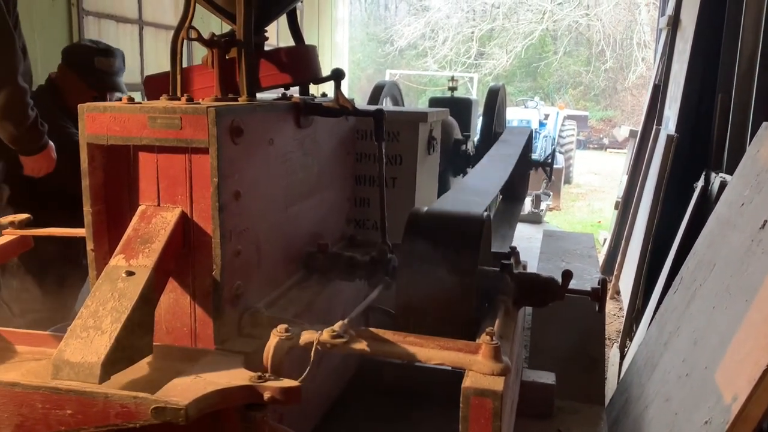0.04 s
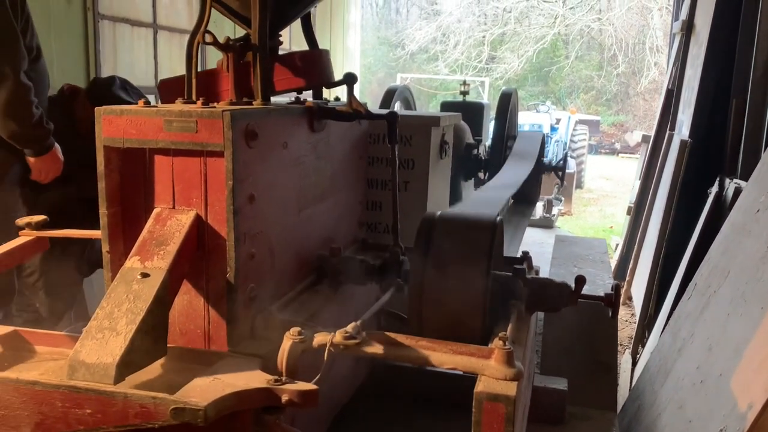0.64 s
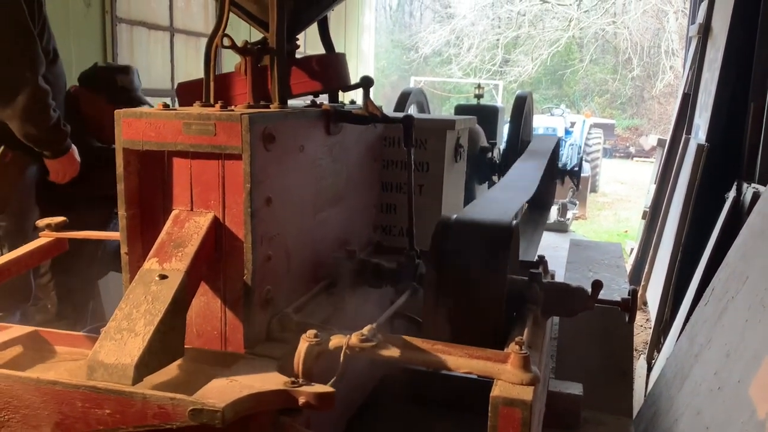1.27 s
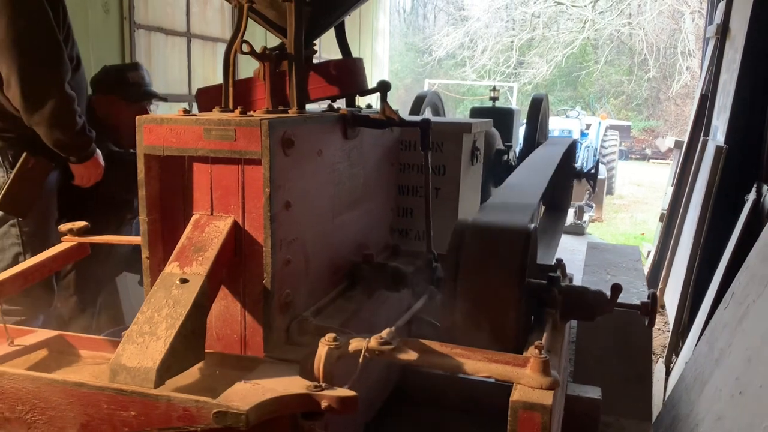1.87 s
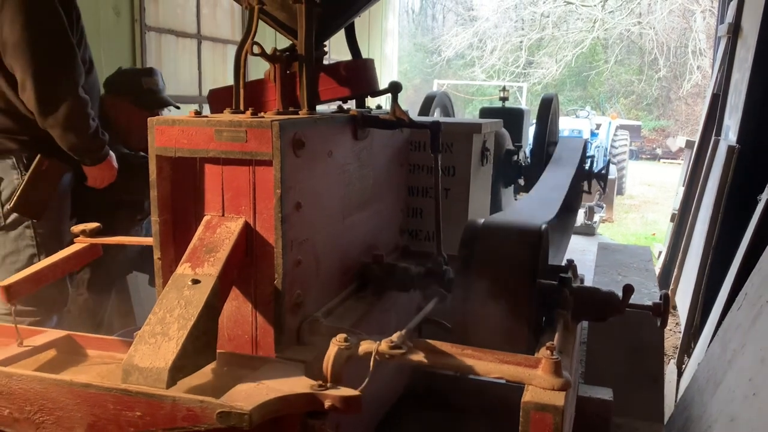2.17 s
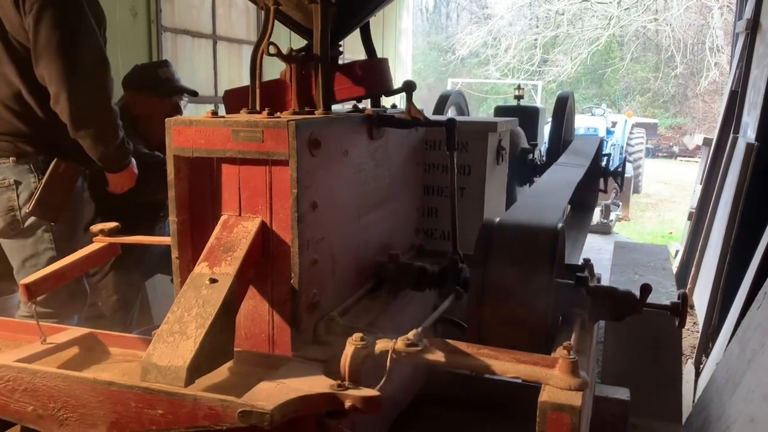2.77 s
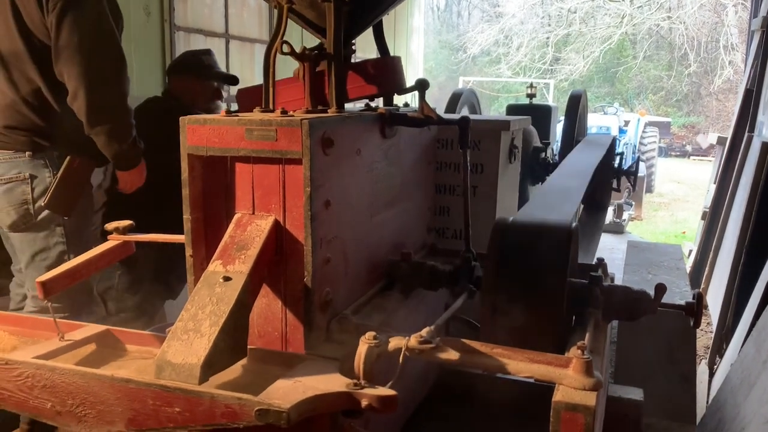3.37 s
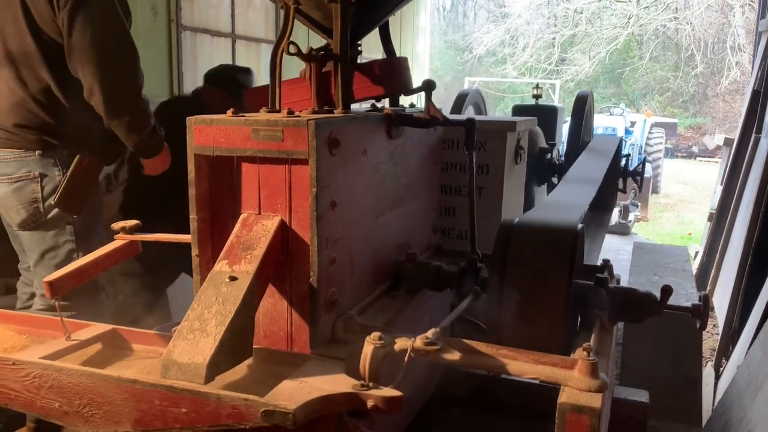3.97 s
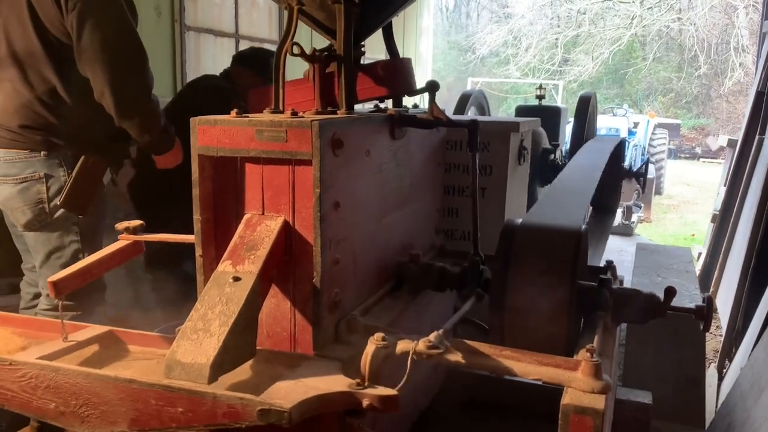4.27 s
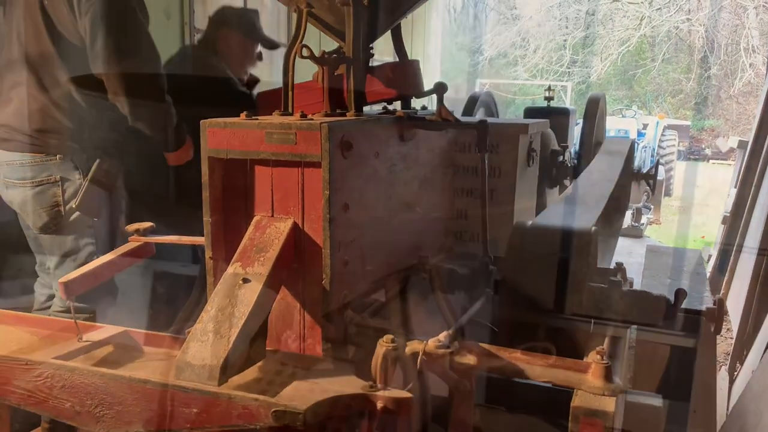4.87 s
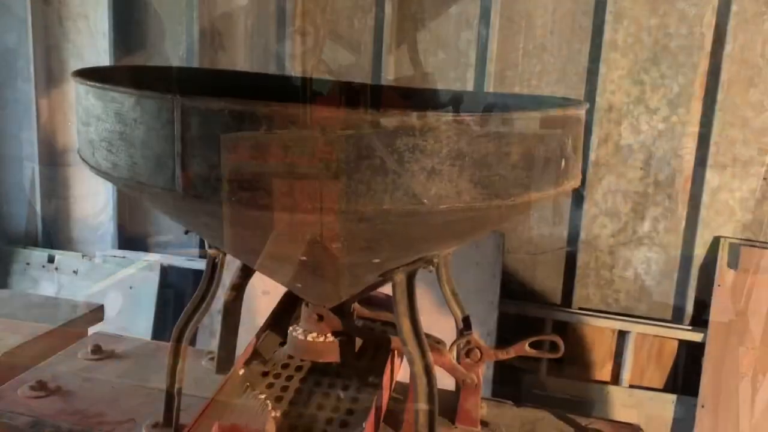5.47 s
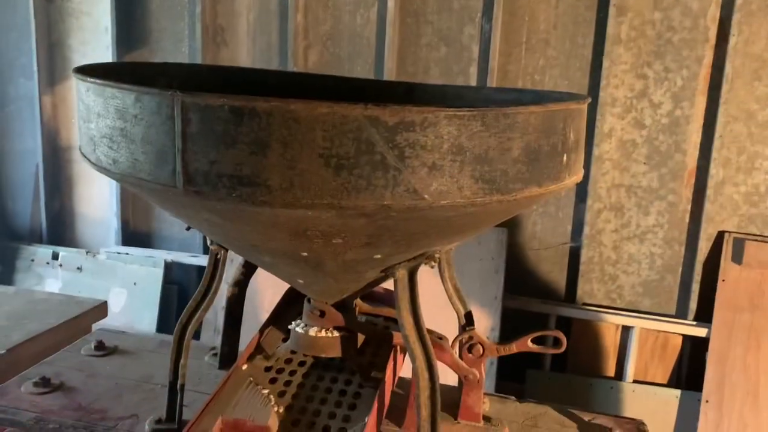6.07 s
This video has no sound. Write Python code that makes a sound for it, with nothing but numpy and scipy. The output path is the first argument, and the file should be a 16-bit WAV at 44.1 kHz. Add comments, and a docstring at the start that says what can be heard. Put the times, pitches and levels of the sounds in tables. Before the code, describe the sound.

A belt-driven mill rumbles and grinds grain under the slow, sharp, regular beat of an engine, turning slightly quieter near the end.

```python
"""Engine driving a grain mill.

A slow single-cylinder engine outside a shed fires twice a second: a sharp exhaust bark and ringing iron over a
falling boom. It drives the mill by a flat belt. The case rumbles, and each cycle the belt surges, the grinding
swells and the gear spits. Wood scrapes once. For the last second the sound blends over to a quieter spot
farther inside."""
import sys
import numpy as np
from scipy import signal
from scipy.fft import rfft, irfft, next_fast_len
from scipy.io import wavfile

SR = 44100
rng = np.random.default_rng(int(sys.argv[2]) if len(sys.argv) > 2 else 0)


def dump(signal):
    """Clip the signal to [-1, 1] and save it as 16-bit WAV at the path in sys.argv[1]."""
    limited = np.clip(np.atleast_2d(signal).T, -1, 1)
    pcm = np.round(limited * 32767).astype(np.int16)
    wavfile.write(sys.argv[1], SR, pcm)


N = 274743
TIME_S = np.arange(N) / SR
GRID_HZ = np.maximum(np.fft.rfftfreq(next_fast_len(N, real=True), 1 / SR), 1)

# Blend from the door to a spot farther inside, 0 to 1: time_s, share
SPOT_BLEND = [(4.85, 0.041), (5.35, 1)]
# Left-right likeness: freq_hz, correlation
STEREO_LIKENESS = [(100, .99), (280, .96), (600, .62), (1500, .45), (4000, .45), (7000, .65), (9000, .94),
                   (14000, .96)]
# Left minus right: freq_hz, level_db
STEREO_BALANCE = [(30, -4), (70, 3.5), (150, 2), (380, 0.5), (700, -3.5), (1300, -0.5), (4400, -1),
                  (8000, -0.5), (14000, 0.5)]
# Left behind right: freq_hz, lag_s
STEREO_LAG = [(100, .00014), (300, .00022), (900, .00014), (1600, .0001), (2400, .00008), (3200, .00029),
              (16000, .00029)]

# Noise spectra: freq_hz, density_db
RUMBLE_COLOUR = [(20, -46), (40, -28), (60, -3.5), (95, 5), (170, 3), (230, 0), (340, -1.5), (420, -9.5),
                 (520, -12.5), (800, -56)]
STONE_COLOUR = [(300, 4.5), (520, 0), (700, 1), (1050, 0), (1600, -0.5), (2300, -1.5), (3500, -9),
                (7000, -16), (16000, -53)]
MEAL_COLOUR = [(800, -25), (2200, -41), (4000, 13.5), (6500, 2), (9000, 5.5), (13800, 0.5), (16000, -22)]
SCRAPE_COLOUR = [(300, -29), (800, -7), (1100, -1), (1600, -7), (2500, -11), (6000, -63)]
SPIT_COLOUR = [(2000, 3), (5000, 7.5), (9000, 12), (13500, 12), (16000, 10.5)]
CLACK_COLOUR = [(400, 3), (900, 1), (1600, -8.5), (2300, 1.5), (3200, -6), (6000, -31), (12000, -35)]
VALVE_COLOUR = [(1500, -39), (2500, -2), (4000, 6), (6500, 2), (9500, 2.5), (13500, 0.5), (16000, -17)]
BARK_COLOUR = [(250, 13), (450, 10.5), (700, -14), (1300, 10), (2200, 4.5), (3300, 6.5), (6300, -0.5),
               (9000, 7.5), (13500, -49), (16000, -5)]

# Resonances on the noise: freq_hz, width_hz, gain_db
CASE_MODES = [(271, 8.7, 2.6), (310, 120, 1.5), (152, 50, 2), (456, 34, 5.3)]
STONE_MODES = [(681, 9, 6.5), (824, 20, 7.5), (991, 21, 9), (1035, 11, -1), (1290, 43, 4.5),
               (1750, 22, -0.5), (1986, 24, 1.5), (2210, 18, 5), (2833, 26, 12.5)]
SPOUT_MODES = [(3490, 650, -24), (3860, 29, 16), (4300, 17, 0), (5940, 44, 9.5)]
KNOCK_MODES = [(1005, 70, 16), (805, 50, 10)]
CLACK_MODES = [(1770, 45, 3), (2210, 160, 4.2), (2660, 120, 3), (2970, 90, 4.6)]
EXHAUST_MODES = [(800, 57, 19.5), (1080, 59, 7), (1347, 10.5, 12.5), (1550, 77, 4.5), (1731, 18, 16),
                 (2010, 110, 9.5), (2185, 50, 11.5), (2410, 49, 4), (2540, 120, 9), (2676, 130, 9),
                 (2924, 126, 10), (3320, 61, -10), (4870, 130, 5.5), (5530, 730, 9.5), (6270, 380, 10)]
SCRAPE_MODES = [(1060, 120, 3), (774, 50, 8), (1380, 60, 6.1), (1700, 110, 5)]

# Mill load over one engine cycle: cycle_fraction, stones_db, meal_db, rumble_db, drone_db
CYCLE_LOAD = [(0, 0.5, -22, 4, -2), (.15, -4.5, -6.5, -1, -0.5), (.3, -5, -10.5, 2, 2.5),
              (.37, -6, -10.5, -2.5, -4), (.47, -2.5, -0.5, 1, -1.5), (.57, 0, 1.5, 0, 4),
              (.68, 3.5, -0.5, 3.5, 4.5), (.79, -2.5, -6, 3, 3), (.9, -3.5, -6, 0, 1.5),
              (1, -5, -18, 2.5, -4)]
# Belt surges: peak_s, level_db, pitch_hz
BELT_SURGES = [(.01, -18, 135), (0.514, -11, 116), (.605, -15, 110), (.755, -16, 121), (1.041, -15.5, 115),
               (1.43, -21.5, 167), (1.469, -13, 123), (1.569, -16, 121), (1.976, -12, 117),
               (2.245, -23, 109), (2.453, -9, 118), (2.564, -13.5, 106), (2.91, -18, 123),
               (2.979, -15, 122), (3.39, -17, 129), (3.47, -14.5, 120), (3.709, -16, 124),
               (3.809, -18, 129), (3.929, -16.5, 119), (4.35, -23, 135), (4.669, -9, 113),
               (4.771, -15.5, 111), (4.851, -21, 128), (5.111, -15, 115)]
# Loose parts, every cycle: after_firing_s, level_db
CYCLE_CLATTER = [(-.03, -39), (0.089, -23.5), (0.269, -22)]
# One-off events in the mill: start_s, level_db
CASE_SHUDDER = [(4.656, -17.5)]
EXTRA_KNOCKS = [(0.457, -28), (.92, -26), (1.346, -30), (1.748, -27), (2.349, -18.5), (3.169, -25),
                (3.441, -25), (3.667, -24), (3.805, -26.5), (3.857, -22), (5.729, -30), (5.762, -27.5),
                (5.994, -28)]
GRIT_TICKS = [(1.961, -26), (2.45, -28), (2.492, -20), (3.403, -29), (3.884, -26), (5.241, -33),
              (5.496, -25), (5.535, -29), (5.803, -31), (5.942, -33)]
# Scrape contour: time_s, level_db
SCRAPE_ENVELOPE = [(4.68, -33), (4.735, -28), (4.772, -22), (4.79, -23), (4.85, -27), (4.93, -49)]
# Wood catching: start_s, level_db, rise_s, t60_s, pitch_hz
SQUEAKS = [(4.728, -21.5, .008, 0.52, 1034), (4.773, -14.5, .014, 0.085, 1090),
           (4.822, -27, 0.011, 0.17, 1005)]
# Gear spit at the door (0) and farther inside (1): share, peak_db, rise_s, t60_s
SPIT_SHAPE = [(0, -21.5, 0.0046, 0.18), (1, -24.5, 0.062, 0.85)]

# Engine beats, one doubled: time_s, bark_db, boom_db, iron_db, strongest_mode_hz, tick_db
FIRINGS = [(0.141, -15, -20, -11, 1750, -45), (0.6324, -15, -18, -19, 1090, -38),
           (1.1196, -16.5, -17, -18, 2200, -32), (1.6051, -17.5, -18, -21, 2200, -33),
           (2.09, -16, -19, -13, 2200, -33), (2.5764, -15.5, -20, -14.5, 1750, -33),
           (3.063, -16.5, -16.5, -11, 2200, -24), (3.5484, -15, -15, -15.5, 1576, -37),
           (4.032, -16.5, -18, -13.5, 1310, -35), (4.511, -16, -16.5, -17, 2300, -35),
           (4.9956, -20, -17, -23, 1090, -43), (5.058, -25.5, -24, -31, 1090, -55),
           (5.601, -18.5, -17.5, -23, 1750, -45), (6.143, -15.5, -19, -19, 2300, -49)]
# Engine iron: freq_hz, level_db, t60_s
IRON_MODES = [(587.5, -13, 0.28), (795, -11, .15), (1090, -13, 0.15), (1310, -11.5, 0.15),
              (1576, -16, 0.17), (1732, -12, 0.15), (2200, -4.5, 0.13), (2302, -6, 0.17), (2890, -8, 0.18)]
# Exhaust boom: age_s, pitch_hz, level_db
BOOM_SWEEP = [(-.012, 202, -56), (.002, 225, 5), (.018, 128, -1), (.04, 87, 1.5), (.065, 65, 1.5),
              (.1, 56, -0.5), (.14, 54, -28), (.22, 52, -40)]
# Shed ringing: freq_hz, level_db, delay_s, rise_s
SHED_MODES = [(39.2, -3, 0.01, 0.024), (161.4, -7, 0, 0.024), (396, -18, 0, 0.032),
              (434.4, -17, 0.02, 0.024), (309.6, -1, 0.024, 0.019), (165.9, -5.5, 0.1, 0.025),
              (120.5, -8.5, 0.104, 0.047), (306.6, -11.5, 0.052, 0.1), (287.4, -11.5, 0.057, 0.1)]


def from_db(db):
    """Decibels to gain."""
    return 10 ** (np.asarray(db) / 20)


def unit_rms(x):
    """Scale to unit power."""
    return x / np.sqrt(np.mean(x ** 2) + 1e-20)


def lookup(table, where):
    """Interpolate the other columns along the first."""
    first, *columns = np.transpose(table)
    return [np.interp(where, first, column) for column in columns]


def on_grid(table):
    """Interpolate a spectrum table over log frequency."""
    hz, value = np.transpose(table)
    return np.interp(np.log(GRID_HZ), np.log(hz), value)


def white_spectrum():
    """Complex spectrum of white noise."""
    return rng.standard_normal(len(GRID_HZ)) + 1j * rng.standard_normal(len(GRID_HZ))


def drift(rate_hz):
    """Smooth random wander, unit RMS."""
    return unit_rms(irfft(white_spectrum() / (1 + (GRID_HZ / rate_hz) ** 2))[:N])


def noise(colour, modes=()):
    """Coloured stereo noise, unit RMS; the shed makes the sides differ."""
    modes_db = sum(db / (1 + (2 * (GRID_HZ - hz) / width_hz) ** 2) for hz, width_hz, db in modes)
    likeness = on_grid(STEREO_LIKENESS)
    mid = np.sqrt(1 + likeness) * white_spectrum()
    side = np.sqrt(1 - likeness) * white_spectrum()
    spectrum = from_db(on_grid(colour) + modes_db) * np.array([mid + side, mid - side])
    return unit_rms(irfft(spectrum)[:, :N])


def tone(pitch_hz):
    """Sine following a pitch curve."""
    return np.sin(2 * np.pi * np.cumsum(pitch_hz) / SR)


def lowpass(x, cutoff_hz):
    """Second-order low-pass."""
    return signal.sosfilt(signal.butter(2, cutoff_hz, fs=SR, output="sos"), x)


def bursts(starts_s, levels_db, rises_s, t60s_s):
    """Envelope of Gaussian rises and exponential decays, summed in power."""
    power = np.zeros(N)
    for start_s, db, rise_s, t60_s in np.broadcast(starts_s, levels_db, rises_s, t60s_s):
        span = slice(*np.searchsorted(TIME_S, [start_s - 2 * rise_s, start_s + rise_s + 2 * t60_s]))
        past_peak_s = TIME_S[span] - start_s - rise_s
        shape_db = np.where(past_peak_s < 0, -20 * (past_peak_s / rise_s) ** 2, -60 * past_peak_s / t60_s)
        power[span] += from_db(db + shape_db) ** 2
    return np.sqrt(power)


def swell(age_s, rise_s):
    """Resonance envelope: builds to 1, then dies."""
    progress = np.maximum(age_s, 0) / rise_s
    return progress ** 2 * np.exp(2 * (1 - progress))


def pings(starts_s, levels_db, low_hz, high_hz, t60_cycles):
    """Small hard contacts: random pitch, random phase per side, shorter when higher."""
    out = np.zeros((2, N))
    for start_s, db, (pitch, left, right) in zip(starts_s, levels_db, rng.random((len(starts_s), 3))):
        hz = low_hz * (high_hz / low_hz) ** pitch
        t60_s = t60_cycles / hz
        span = slice(*np.searchsorted(TIME_S, [start_s, start_s + t60_s]))
        age_s = TIME_S[span] - start_s
        envelope = (1 - np.exp(-age_s * hz)) * from_db(db - 60 * age_s / t60_s)
        out[:, span] += envelope * np.sin(2 * np.pi * hz * age_s + np.pi * np.array([[left], [right]]))
    return out


def inside(times_s=TIME_S):
    """Share of the spot farther inside, 0 to 1."""
    return lookup(SPOT_BLEND, times_s)[0]


def cycle_starts():
    """Firing times without the doubled beat, extended one cycle each way."""
    fire_s = np.array(FIRINGS)[:, 0]
    fire_s = fire_s[np.diff(fire_s, prepend=-1) > 0.2]
    return np.r_[2 * fire_s[0] - fire_s[1], fire_s, 2 * fire_s[-1] - fire_s[-2]]


def cycle_load_db():
    """Level swings of stones, meal, rumble and drone, locked to the engine."""
    starts_s = cycle_starts()
    cycle_fraction = np.interp(TIME_S, starts_s, np.arange(len(starts_s))) % 1
    return lookup(CYCLE_LOAD, cycle_fraction)


def case_rumble(level_db, inside_db, throb_db):
    """The mill's wooden case rumbles unevenly with the load and shudders once."""
    _, _, load_db, _ = cycle_load_db()
    running = from_db(level_db + load_db + inside_db * inside() + throb_db * np.tanh(drift(17)))
    shudder = bursts(*np.transpose(CASE_SHUDDER), rises_s=0.012, t60s_s=0.47)
    return np.hypot(running, shudder) * noise(RUMBLE_COLOUR, CASE_MODES)


def case_hum(level_db, inside_db, pitch_hz, wander_hz, flutter_db):
    """One mode of the case sings as a wavering hum."""
    hum = tone(pitch_hz + wander_hz * drift(7.4))
    return from_db(level_db + inside_db * inside() + flutter_db * np.tanh(drift(22))) * hum


def belt_drone(level_db, inside_db, pitch_hz, wander_hz, flutter_db, surge_width_s, sag_hz_per_s):
    """Belt and frame drone on an unsteady note; each surge swells and sags in pitch."""
    *_, load_db = cycle_load_db()
    gain = from_db(level_db + load_db + inside_db * inside() + flutter_db * np.tanh(drift(25)))
    out = gain * tone(pitch_hz + wander_hz * drift(11.2))
    for peak_s, db, hz in BELT_SURGES:
        age_s = TIME_S - peak_s
        turns = hz * age_s - sag_hz_per_s * age_s ** 2 / 2 + rng.random()
        out += from_db(db) * np.exp(-(age_s / surge_width_s) ** 2) * np.sin(2 * np.pi * turns)
    return out


def grinding(stones_db, stones_inside_db, meal_db, meal_inside_db, cracks_per_s):
    """Each firing pulls the stones round faster: grain crunches, kernels crack, meal hisses out."""
    stones_load_db, meal_load_db, *_ = cycle_load_db()
    resistance_db = 1.7 * np.tanh(drift(18))  # a kernel resists only so much
    crunch_db = stones_db + stones_inside_db * inside() + stones_load_db + resistance_db
    hiss_db = meal_db + meal_inside_db * inside() + meal_load_db + 1.37 * drift(240)
    cracked = rng.random(N) < cracks_per_s / SR
    size_db = -5.5 + 1.8 * np.minimum(rng.exponential(1, cracked.sum()), 3)
    cracks = pings(TIME_S[cracked], crunch_db[cracked] + size_db, low_hz=602, high_hz=1996, t60_cycles=72)
    crunch = from_db(crunch_db) * noise(STONE_COLOUR, STONE_MODES)
    return crunch + cracks + from_db(hiss_db) * noise(MEAL_COLOUR, SPOUT_MODES)


def mill_knocks(clatter_inside_db, rise_s, clatter_t60_s, extra_t60_s):
    """Loose parts clatter each cycle in the stones; further knocks, some of them loud, ring the casing at a
    common pitch."""
    hits = [(start_s + delay_s, db + rng.uniform(-1.3, 1.1))
            for start_s in cycle_starts() for delay_s, db in CYCLE_CLATTER]
    hit_s, hit_db = np.transpose(hits)
    clatter = bursts(hit_s, hit_db + clatter_inside_db * inside(hit_s), rise_s, clatter_t60_s)
    extra = bursts(*np.transpose(EXTRA_KNOCKS), rise_s, extra_t60_s)
    return noise(STONE_COLOUR, STONE_MODES) * clatter + noise(STONE_COLOUR, KNOCK_MODES) * extra


def spout_grit(rise_s, t60_s):
    """Hard grains tick dully in the spout."""
    return noise(BARK_COLOUR, SPOUT_MODES) * bursts(*np.transpose(GRIT_TICKS), rise_s, t60_s)


def wood_scrape(rough_db, wander_hz):
    """Wood scrapes roughly and catches in three overlapping squeaks."""
    level_db = np.interp(TIME_S, *np.transpose(SCRAPE_ENVELOPE), left=-np.inf, right=-np.inf)
    squeaks = sum(bursts([start_s], db, rise_s, t60_s) * tone(hz + wander_hz * drift(46))
                  for start_s, db, rise_s, t60_s, hz in SQUEAKS)
    return squeaks + from_db(level_db + rough_db * drift(80)) * noise(SCRAPE_COLOUR, SCRAPE_MODES)


def gear_spits(lead_s):
    """The running gear spits before each firing; farther inside the walls smear it."""
    peaks_s = cycle_starts()[1:-1] - lead_s
    peak_db, rise_s, t60_s = lookup(SPIT_SHAPE, inside(peaks_s))
    peak_db += rng.uniform(-1.7, 1, len(peaks_s))
    return noise(SPIT_COLOUR) * bursts(peaks_s - rise_s, peak_db, rise_s, t60_s)


def firing_ticks(lead_s, rise_s, t60_s):
    """A light tick, perhaps the igniter, just ahead of each firing."""
    fire_s, *_, tick_db = np.transpose(FIRINGS)
    return noise(SPIT_COLOUR) * bursts(fire_s - lead_s, tick_db, rise_s, t60_s)


def fittings_rattle(gain_db, delay_s, span_s, contacts):
    """Each firing shakes loose fittings into a quick run of contacts."""
    fire_s, bark_db, *_ = np.repeat(FIRINGS, contacts, axis=0).T
    starts_s = fire_s + delay_s + span_s * rng.random(len(fire_s))
    return pings(starts_s, bark_db + gain_db, low_hz=1094, high_hz=7450, t60_cycles=110)


def iron_ring(delay_s, rise_s, accent_db, spread_db, detune):
    """Each firing rings the iron, one mode accented; strengths and pitches vary slightly."""
    out = np.zeros((2, N + SR))
    age_s = np.arange(SR // 2) / SR
    attack = 1 - np.exp(-age_s / rise_s)
    for fire_s, _, _, iron_db, strongest_hz, _ in FIRINGS:
        start = round((fire_s + delay_s) * SR)
        accented = np.argmin(np.abs(np.array(IRON_MODES)[:, 0] - strongest_hz))
        for mode, (hz, db, t60_s) in enumerate(IRON_MODES):
            strike_db = iron_db + db + accent_db * (mode == accented) + spread_db * rng.standard_normal()
            envelope = attack * from_db(strike_db - 60 * age_s / t60_s)
            offsets_rad = rng.uniform(0, 2 * np.pi) + rng.standard_normal((2, 1))
            phase_rad = 2 * np.pi * hz * (1 + detune * rng.standard_normal()) * age_s
            out[:, start:start + len(age_s)] += envelope * np.sin(phase_rad + offsets_rad)
    return out[:, :N]


def iron_clack(knock_db, crack_db, rise_s):
    """A hard knock in the iron tops each bark; a dry, bright crack follows."""
    fire_s, bark_db, *_ = np.transpose(FIRINGS)
    knock = bursts(fire_s + 0.0061, bark_db + knock_db, rise_s, t60s_s=0.12)
    crack = bursts(fire_s + 0.014, bark_db + crack_db, rise_s, t60s_s=0.08)
    return noise(CLACK_COLOUR, CLACK_MODES) * knock + noise(VALVE_COLOUR) * crack


def exhaust_boom(gain_db, lead_s, echo_db, echo_rise_s):
    """The slug of gas sinks in pitch as it spreads; the shed rings and echoes alike every time."""
    age_s = np.arange(SR) / SR - lead_s
    pitch_hz, sweep_db = lookup(BOOM_SWEEP, age_s)
    boom = from_db(sweep_db) * tone(pitch_hz) * (age_s < BOOM_SWEEP[-1][0])
    for hz, db, delay_s, rise_s in SHED_MODES:
        boom += from_db(db) * swell(age_s - delay_s, rise_s) * np.sin(2 * np.pi * hz * age_s)
    echo = from_db(echo_db) * swell(age_s, echo_rise_s) * noise(RUMBLE_COLOUR, CASE_MODES)[:, :SR]
    impulses = np.zeros(N)
    for fire_s, _, boom_db, *_ in FIRINGS:
        impulses[round((fire_s - lead_s) * SR)] = from_db(boom_db + gain_db)
    return signal.fftconvolve(impulses[None], boom + echo)[:, :N]


def wall_muffle(x, cutoff_hz, inside_db):
    """Farther inside, timber and distance hold back all but the deepest sound."""
    deep = lowpass(x, cutoff_hz)
    return deep + from_db(inside_db * inside()) * (x - deep)


def exhaust_bark(lead_s, hiss_db, tail_db, ragged_db):
    """Gas tears and hisses out of the opening valve; the shed returns a duller, ringing tail."""
    fire_s, bark_db, *_ = np.transpose(FIRINGS)
    open_s = fire_s - lead_s
    blast = noise(BARK_COLOUR, EXHAUST_MODES) * bursts(open_s, bark_db, rises_s=0.019, t60s_s=0.15)
    hiss = noise(VALVE_COLOUR) * bursts(open_s, bark_db + hiss_db, rises_s=0.015, t60s_s=0.29)
    tail = lowpass(noise(BARK_COLOUR, EXHAUST_MODES), cutoff_hz=6500)
    tail *= from_db(ragged_db / 2 * drift(90))
    tail *= bursts(fire_s, bark_db + tail_db, rises_s=0.028, t60s_s=0.4)
    return (blast + hiss) * from_db(ragged_db * drift(100)) + tail


def scene():
    """Mill and engine together; the sound reaches the right side first."""
    boom = exhaust_boom(gain_db=2, lead_s=0.01429, echo_db=-11, echo_rise_s=0.11)
    mix = wall_muffle(boom, cutoff_hz=68, inside_db=-29)
    mix += case_rumble(level_db=-24, inside_db=-4, throb_db=2)
    mix += case_hum(level_db=-31, inside_db=-12, pitch_hz=309.8, wander_hz=4.5, flutter_db=5)
    mix += belt_drone(level_db=-29, inside_db=-3.5, pitch_hz=121.4, wander_hz=6.3, flutter_db=8,
                      surge_width_s=0.031, sag_hz_per_s=340)
    mix += exhaust_bark(lead_s=0.0036, hiss_db=-5, tail_db=-4, ragged_db=1.5)
    mix += iron_clack(knock_db=-4, crack_db=-1, rise_s=0.003)
    mix += iron_ring(delay_s=0.0062, rise_s=0.0022, accent_db=7.5, spread_db=0.5, detune=0.0018)
    mix += fittings_rattle(gain_db=-8, delay_s=0.008, span_s=0.034, contacts=16)
    mix += grinding(stones_db=-25.5, stones_inside_db=-5, meal_db=-30, meal_inside_db=-3.5,
                    cracks_per_s=280)
    mix += mill_knocks(clatter_inside_db=-5, rise_s=0.0023, clatter_t60_s=0.16, extra_t60_s=0.2)
    mix += wood_scrape(rough_db=1, wander_hz=12)
    mix += gear_spits(lead_s=0.1)
    mix += firing_ticks(lead_s=0.025, rise_s=0.001, t60_s=0.11)
    mix += spout_grit(rise_s=0.0016, t60_s=0.056)
    half_db = on_grid(STEREO_BALANCE) / 2
    left = from_db(half_db) * np.exp(-2j * np.pi * GRID_HZ * on_grid(STEREO_LAG))
    right = from_db(-half_db)
    return irfft(rfft(mix, 2 * len(GRID_HZ) - 2) * np.array([left, right]))[:, :N]


def record(dry):
    """Microphone: deepest bass shed, peaks rounded, top cut."""
    highpassed = signal.sosfilt(signal.butter(1, 12, "high", fs=SR, output="sos"), dry)
    rounded = 1.5 * np.tanh(highpassed / 1.5)
    return signal.sosfilt(signal.ellip(10, 0.1, 80, 15600, fs=SR, output="sos"), rounded)


dry = scene()
out = record(dry)
dump(out)
```